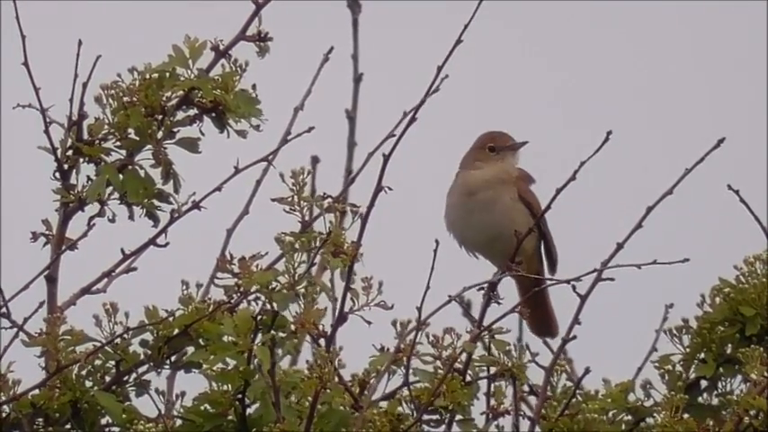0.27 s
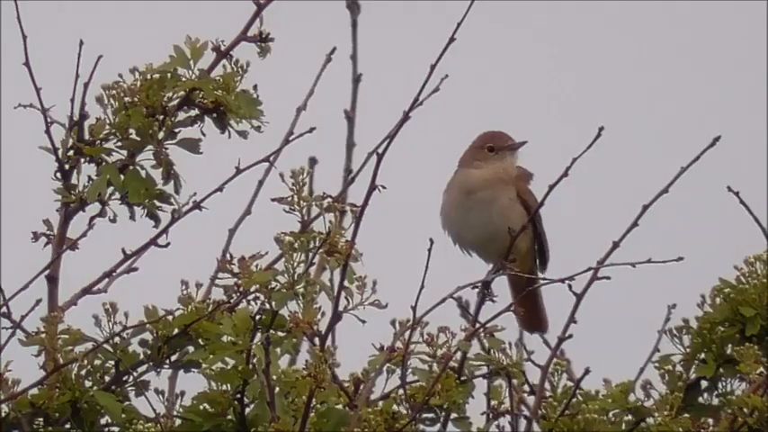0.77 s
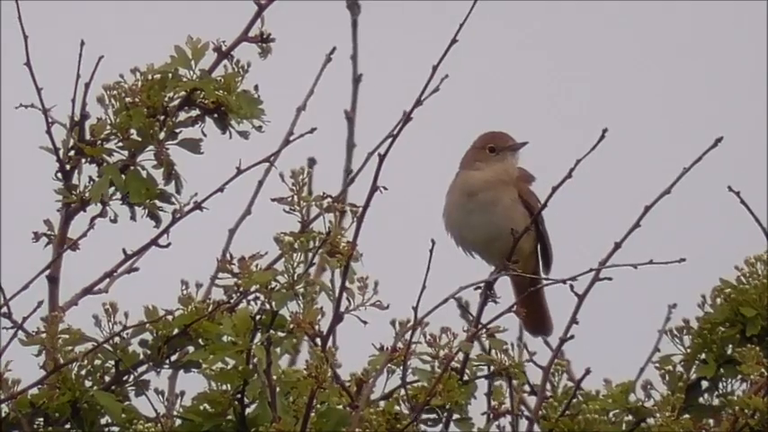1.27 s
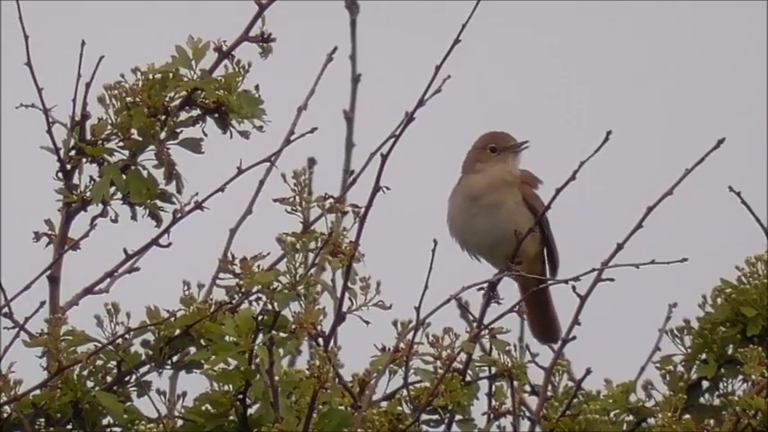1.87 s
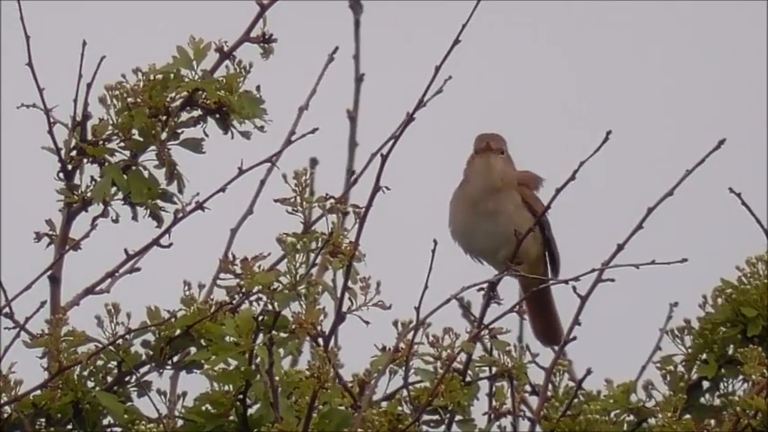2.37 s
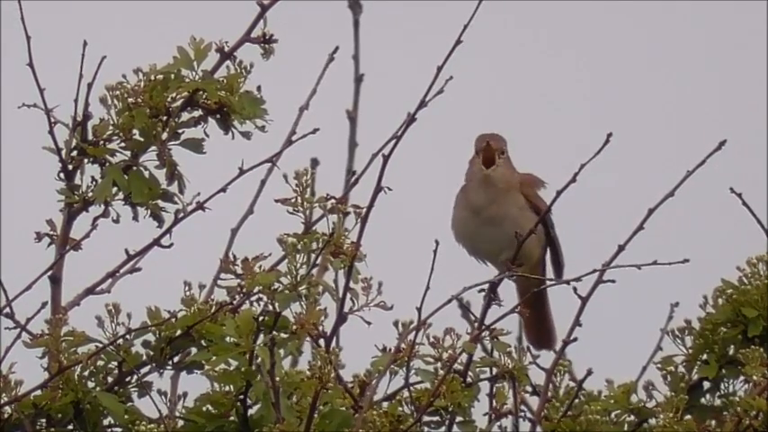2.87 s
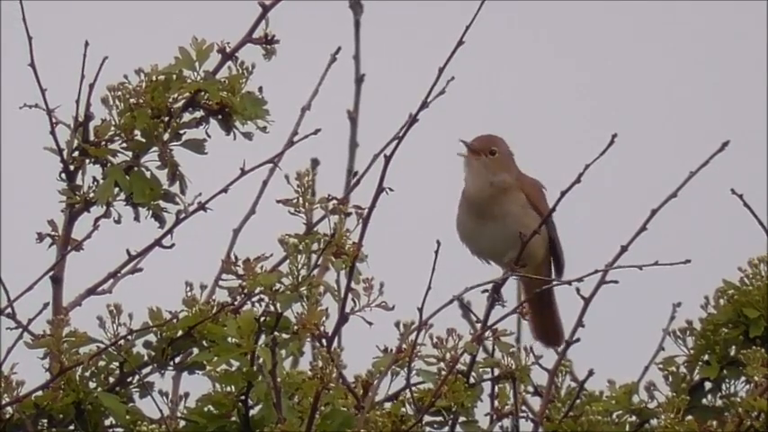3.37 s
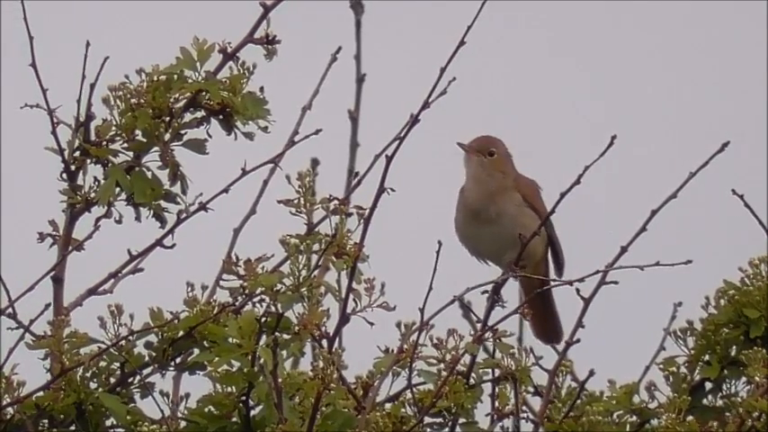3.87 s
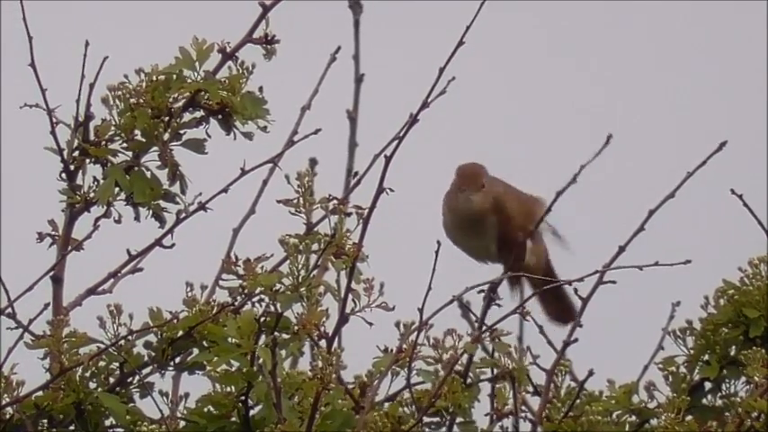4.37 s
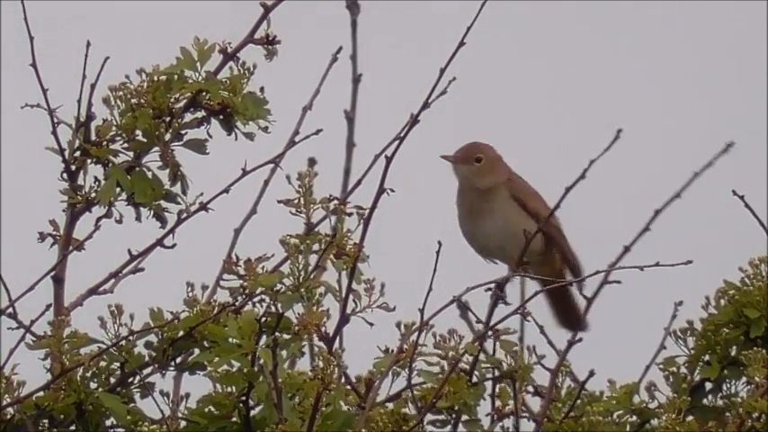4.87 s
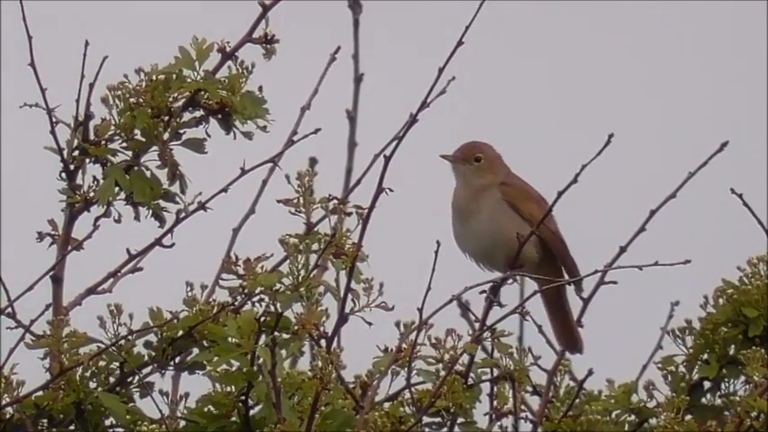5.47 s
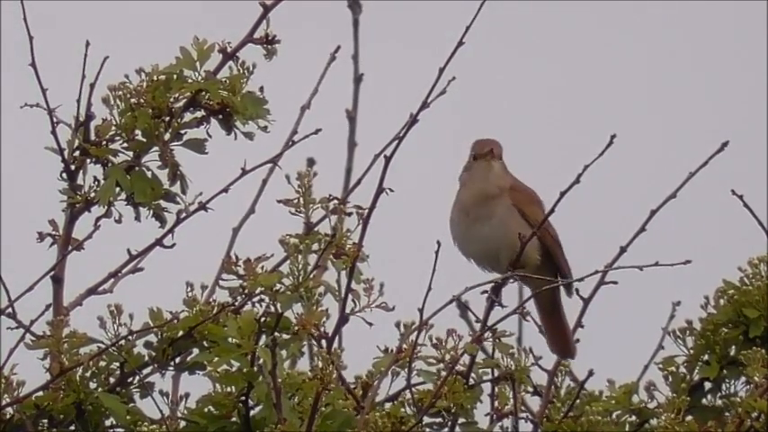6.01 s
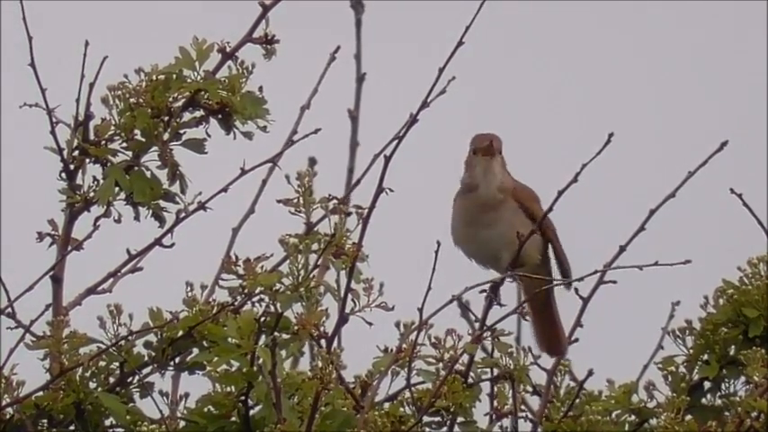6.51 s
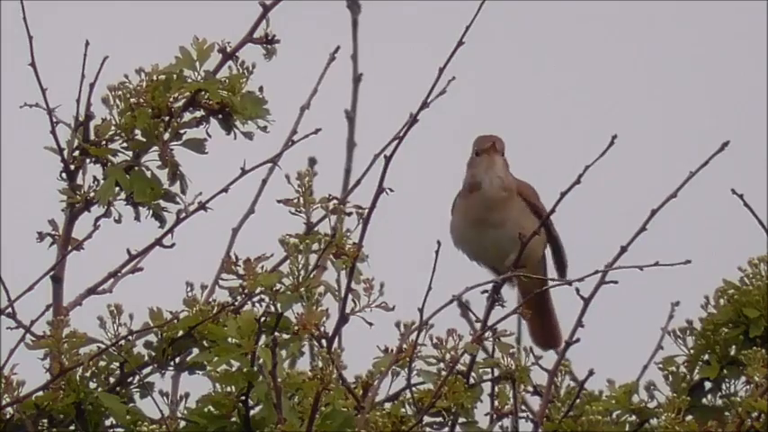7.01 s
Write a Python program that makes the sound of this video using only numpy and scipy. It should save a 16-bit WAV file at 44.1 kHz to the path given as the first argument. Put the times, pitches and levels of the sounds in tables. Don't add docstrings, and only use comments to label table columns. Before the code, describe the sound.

A nightingale on a bush sings two short phrases of buzzes, glides and a fast trill, over gusty wind rumble and distant birds.

```python
import sys
import numpy as np
from scipy import signal
from scipy.fft import rfft, irfft
from scipy.io import wavfile
from scipy.ndimage import uniform_filter1d

SR = 44100
rng = np.random.default_rng(int(sys.argv[2]) if len(sys.argv) > 2 else 0)


def magnitude_from_level(level_db):
    exponent = np.asarray(level_db, float) / 20
    return 10 ** exponent


def materialize(psi):
    bounded = np.clip(np.atleast_2d(psi).T, -1, 1)
    quanta = np.round(bounded * 32767).astype(np.int16)
    wavfile.write(sys.argv[1], SR, quanta)


N = 319725


def rms_one(x):
    return x / np.sqrt(np.mean(x ** 2) + 1e-20)


def at_hz(points, hz, column=1):
    points = np.array(points)
    return np.interp(np.log(hz + 1), np.log(points[:, 0]), points[:, column])


def drift(rate_hz):
    pole = np.exp(-40 * np.pi * rate_hz / SR)
    slow = signal.lfilter([1], [1, -2 * pole, pole * pole], rng.standard_normal(N // 20 + 4002))[4000:]
    return np.interp(np.arange(N) / 20, np.arange(len(slow)), rms_one(slow))


def band(x, low_hz, high_hz):
    return signal.sosfilt(signal.butter(2, [low_hz, min(high_hz, .45 * SR)], "band", fs=SR, output="sos"), x)


def bands(spectrum, low_hz, count, flicker):
    edges_hz = low_hz * 2 ** (np.arange(count + 1) / 3)
    white = rng.standard_normal((2, 2, N))
    out = np.zeros((2, N))
    for k, (low, high) in enumerate(zip(edges_hz, edges_hz[1:])):
        level_db = at_hz(spectrum, low * 1.148) + flicker(low)
        out += magnitude_from_level(level_db) * band(white[k % 2], low, high)
    return rms_one(out)


def add(out, start_s, sound):
    i = max(int(round(start_s * SR)), 0)
    out[i:i + len(sound)] += sound[:N - i]


# time_s, level_db
GUST = [(0, -32.5), (.36, -36), (.9, -34.5), (1.2, -38), (1.46, -33.5), (1.9, -40), (2.75, -38),
        (3.01, -38), (3.15, -28.5), (3.74, -39.5), (4.0, -39), (4.51, -38.5), (4.78, -44.5), (5.2, -36),
        (6.0, -37), (6.9, -35.5), (7.25, -32.5)]
# time_s, gain_db
BUFFETS = [(.76, 3.5), (1.01, 4.5), (1.44, 5), (1.88, -3), (2.17, 5), (3.14, -0.5), (2.44, 5), (3.836, 8),
           (5.198, 4), (5.36, -1.5), (5.497, 4.5), (5.606, -8), (6.115, 6.5), (6.222, -7), (6.31, 6),
           (6.39, -8), (7.15, 2)]
BUFFET_S = 0.036
# freq_hz, density_db_per_hz
WIND = [(12, -52), (20, -39), (79, -1), (144, 0.5), (256, -8), (743, -52), (1300, -106), (1690, -82),
        (2860, -120)]


def wind():
    t = np.arange(N) / SR
    gust_db = np.interp(t, *np.transpose(GUST))
    for s, db in BUFFETS:
        gust_db += db * np.exp(-((t - s) / BUFFET_S) ** 2)
    lumps = .5 * drift(4.1) + 0.77 * drift(39.0)

    def flicker_db(hz):
        return lumps * (0.54 + 0.71 * np.log2(hz / 22)) + 2.03 * drift(18.0)

    push, own = bands(WIND, 21.69, count=18, flicker=flicker_db)
    left = -magnitude_from_level(9.0) * np.pad(push, (2, 0))[:N]
    left += magnitude_from_level(0.5) * own + magnitude_from_level(9.0) * band(own, 344.0, 1035.0)
    return magnitude_from_level(gust_db) * np.array([left, magnitude_from_level(14.0) * push])


# freq_hz, density_db_per_hz
AIR = [(410, -29), (700, -2), (1190, -3), (1320, 3.5), (1690, -15.5), (2080, -10), (2590, -11),
       (4470, -5.5), (5790, -15.5), (7400, -14), (8000, -11.5), (15500, -15)]
AIR_DB = -59.5


def air():
    hiss = bands(AIR, 630.5, count=14, flicker=lambda hz: 1.0 * drift(4.3))
    return magnitude_from_level(AIR_DB) * hiss * magnitude_from_level(np.array([[1.6], [-1.6]]))


# freq_hz, gain_db
BEAK = [(5000, -54), (7300, -34), (8200, -25), (10000, -6.5), (12000, 2), (14000, -22), (16500, -40),
        (19000, -120)]


def whistle(hz, db, fade_s, overtones=()):
    phase = 2 * np.pi * np.cumsum(hz) / SR
    octaves = np.maximum(np.log2(hz / 2000), 0)
    tone = np.sin(phase)
    for k, over_db, slope_db in overtones:
        gain_db = over_db + slope_db * octaves + at_hz(BEAK, k * hz)
        tone = tone + magnitude_from_level(gain_db) * np.sin(k * phase)
    age_s = np.arange(len(hz)) / SR
    fade = np.clip(np.minimum(age_s, age_s[::-1]) / fade_s, 0, 1) ** 2
    return np.sqrt(2) * magnitude_from_level(db) * tone * fade


def note(rows, fade_s, overtones=()):
    s, hz, db = np.transpose(rows)
    t = np.arange(s[0] - fade_s / 2, s[-1] + fade_s / 2, 1 / SR)
    size = len(t) // (2 * len(s)) + 1
    track_hz = uniform_filter1d(np.interp(t, s, hz), size, mode="nearest")
    return whistle(track_hz, np.interp(t, s, db), fade_s, overtones)


def repeat(shape, rows, fade_s, overtones=()):
    out = np.zeros(N)
    for s, db, pitch in rows:
        sung = np.array(shape) * [1, pitch, 1] + [0, 0, db]
        add(out, s - fade_s / 2, note(sung, fade_s, overtones))
    return out


def warble(db, slope_db, turns, fade_s, overtones=()):
    s, hz = np.transpose(turns)
    place = np.interp(np.arange(s[0], s[-1], 1 / SR), s, np.arange(len(s)))
    eased = np.floor(place) + (1 - np.cos(np.pi * (place % 1))) / 2
    track_hz = np.interp(eased, np.arange(len(s)), hz)
    out = np.zeros(N)
    add(out, s[0], whistle(track_hz, db + slope_db * np.log2(track_hz / 3000), fade_s, overtones))
    return out


def shaken(hz, rate_hz, db, swing, lead_rad, dip_db, overtones):
    turn = 2 * np.pi * rate_hz * np.arange(len(hz)) / SR
    swell_db = -14. * np.clip(1 - turn / (4 * np.pi), 0, 1)
    level_db = db + swell_db - dip_db * (1 + np.cos(turn)) / 2
    return whistle(hz * (1 - swing * np.cos(turn + lead_rad)), level_db, 0.0025, overtones)


# time_s, level_db
CRICKET = [
    (0, -73.5),
    (3.6, -64.5),
    (5.5, -69),
    (7.25, -76),
]
# start_s, peak_db
CHIRPS = [(0.4253, -74), (0.5684, -59), (0.6293, -55), (0.7116, -73), (0.787, -63), (0.8997, -57),
          (1.0159, -70), (1.0868, -69), (1.2728, -70), (1.3442, -68), (1.4075, -64), (1.4769, -62),
          (1.5477, -51), (1.6201, -60), (1.6899, -52), (1.7627, -54), (1.8416, -53), (1.9638, -52),
          (2.0446, -49), (2.1374, -51), (2.2142, -56), (2.2865, -55), (2.3659, -56), (2.4407, -62),
          (3.8218, -53), (3.935, -60), (4.0278, -53), (4.1146, -51), (4.1715, -58), (4.2304, -48),
               (4.3496, -58), (4.4045, -54), (4.4908, -65), (4.5481, -53), (4.621, -61), (4.7362, -47),
               (4.813, -63), (4.8884, -59), (5.0565, -66), (5.1263, -69), (5.1987, -65), (5.3044, -58),
               (5.4147, -55), (5.5743, -52), (5.6965, -53), (5.8108, -48), (5.928, -46), (6.0667, -68)]
# time_s, pitch_hz, level_db
CHIRP = [(0, 2228, -8), (.012, 2080, -11.5), (.032, 2040, -20)]


def insects():
    beat = np.cos(2 * np.pi * np.cumsum(13.0 + 1.82 * drift(1.0)) / SR)
    cricket_db = np.interp(np.arange(N) / SR, *np.transpose(CRICKET))
    throb = rms_one(band(rng.standard_normal(N), 1888.0, 2224.0)) * magnitude_from_level(cricket_db - 4.5 + 7.9 * beat)
    chirps = repeat(CHIRP, [(s, db, 1) for s, db in CHIRPS], .008)
    whine = rms_one(band(rng.standard_normal(N), 7740., 7900.)) * magnitude_from_level(-79.0)
    return throb + chirps + whine


# start_s, length_s, from_hz, to_hz, level_db
FALLS = [(.112, 0.021, 3300, 1890, -64), (0.186, 0.027, 3350, 1740, -63), (0.243, .02, 4080, 3000, -67),
         (0.262, 0.028, 3400, 1770, -60.5), (0.344, 0.027, 3400, 1740, -64), (1.377, 0.08, 4260, 2680, -66),
         (1.655, 0.014, 7000, 4150, -56), (2.452, 0.087, 6250, 5700, -70), (2.48, 0.061, 12300, 11500, -69),
         (4.678, 0.036, 7430, 6900, -68.5), (4.741, 0.062, 7170, 6500, -71.5),
         (4.88, 0.056, 3720, 2460, -68), (5.505, 0.035, 2810, 2470, -64.5), (5.59, 0.0159, 6300, 5100, -63),
         (6.127, 0.068, 6630, 5700, -66)]
CLIMBS = [(1.03, 0.13, 2890, 3190, -72), (2.12, 0.01, 3980, 5500, -52.5), (2.32, 0.027, 3360, 4200, -60.5),
          (3.95, .07, 5080, 5440, -73), (4.42, 0.045, 3230, 4660, -64.5), (4.585, 0.06, 3140, 4990, -64),
          (4.04, .022, 3480, 4900, -75), (4.152, .015, 3660, 4740, -74), (5.262, .014, 4670, 6060, -69)]
HELD = [(0., 0.059, 3630, 3550, -68), (.03, 0.07, 2150, 2050, -72), (.07, 0.11, 1330, 1290, -76),
        (1.785, 0.11, 3620, 3780, -66), (2.16, 0.1, 3660, 3720, -62), (4.08, 0.083, 2800, 2880, -67),
        (5.457, 0.054, 2850, 2860, -65.5), (5.765, 0.13, 2780, 2800, -67), (6.16, 0.26, 1290, 1370, -78),
        (6.445, .095, 1365, 1385, -76), (5.04, .15, 1350, 1390, -79), (5.275, .12, 2110, 2040, -73),
        (4.9, .09, 2060, 2050, -73)]
GLIDE_DB_PER_OCTAVE = 10


def far_glides():
    out = np.zeros(N)
    for s, length_s, *ends_hz, db in FALLS + CLIMBS + HELD:
        ends_db = db - GLIDE_DB_PER_OCTAVE * np.log2(np.array(ends_hz) / min(ends_hz))
        rows = np.transpose([(0, length_s), ends_hz, ends_db])
        add(out, s - .004, note(rows, 0.00626 + 0.028 * length_s))
    return out


def hedge_chorus():
    out = np.zeros(N)
    for when, pitch, bend, span, loud in rng.random((700, 5)):
        hz = 2400 * 2 ** pitch
        db = -81 + 4 * loud + 4.5 * (.52 < when < .83)
        rows = [(0, hz, db), (0.0098 + 0.0217 * span, hz * 2 ** (.7 * bend - .35), db)]
        add(out, when * (N / SR - .1), note(rows, 0.00915))
    return out


# [(time_s, pitch_hz)]
CURLS = [(-69, [(.15, 2980), (.172, 3030), (.192, 2350)]), (-77, [(.25, 3400), (.275, 2570)]),
         (-73, [(.27, 2170), (.355, 2060)]), (-77.5, [(.37, 3480), (.41, 3580), (.45, 3500)]),
         (-76, [(.472, 3500), (.492, 3560)]), (-74, [(1.21, 3600), (1.252, 4580)]),
         (-67, [(1.39, 2960), (1.432, 2890)]), (-64, [(1.495, 3820), (1.516, 4110), (1.542, 3130)]),
         (-71, [(1.61, 4850), (1.645, 4280)]), (-56, [(1.682, 4180), (1.697, 5070), (1.724, 5780)]),
         (-64, [(1.98, 4080), (2.01, 5500)]), (-69, [(1.998, 3200), (2.045, 4520)]),
         (-66, [(2.083, 4950), (2.105, 5420)]), (-63, [(2.095, 4760), (2.115, 4850)]),
         (-76, [(2.29, 4500), (2.36, 4330)]), (-69.5, [(2.36, 3950), (2.43, 3820)]),
         (-70, [(2.69, 3720), (2.75, 3850)]), (-69, [(3.465, 4230), (3.51, 4970), (3.545, 3480)]),
         (-65.5, [(3.6, 3870), (3.652, 4630), (3.685, 3440)]), (-64, [(3.76, 3700), (3.795, 4500)]),
         (-68, [(3.808, 4200), (3.835, 3530)]),
         (-72.5, [(3.825, 2300), (3.97, 2270), (3.998, 2210), (4.04, 2265), (4.112, 2270)]),
              (-70.5, [(3.892, 2540), (3.935, 2690), (4.03, 2740)]), (-68.5, [(3.915, 4850), (3.95, 4920)]),
              (-74, [(4.232, 4430), (4.272, 4600)]), (-80, [(4.285, 4100), (4.33, 4200), (4.4, 5220)]),
              (-65.5, [(4.365, 2930), (4.42, 2970), (4.51, 2905), (4.55, 3000), (4.665, 2950)]),
              (-67.5, [(4.735, 2750), (4.785, 3600), (4.81, 5330)]), (-76, [(4.82, 3350), (4.885, 3010)]),
              (-74, [(4.945, 3270), (4.962, 3720), (4.982, 3150)]), (-73, [(5.022, 3150), (5.065, 3760),
              (5.092, 4350)]), (-74, [(5.05, 3070), (5.138, 3040)]), (-68, [(5.015, 4700), (5.04, 5500)]),
              (-72, [(5.148, 3770), (5.172, 3430)]), (-70, [(5.175, 3870), (5.2, 4500)]),
              (-78, [(5.258, 3270), (5.322, 3560)]), (-74, [(5.22, 3950), (5.29, 3930)]),
              (-63, [(5.34, 3850), (5.362, 3970)]), (-68, [(5.478, 4000), (5.502, 4000)]),
              (-65, [(5.645, 4160), (5.663, 2830), (5.685, 2380)]), (-72, [(5.697, 2520), (5.748, 2730)]),
              (-67, [(5.91, 4500), (5.932, 3600)]), (-70, [(5.945, 2110), (6.002, 1920)]),
              (-70, [(5.96, 3570), (5.99, 3350), (6.012, 3430)]), (-79, [(6.015, 2230), (6.1, 2320)]),
              (-74, [(6.098, 2660), (6.145, 2960)]),
         (-71, [(3.9, 3400), (3.96, 3520), (4.055, 2850)]),
    (-69, [(4.145, 3290), (4.21, 3450), (4.3, 2880)]),
    (-62, [(2.165, 4400), (2.235, 2600)]),
]


def hedge_curls():
    return sum(warble(db, 0, turns, 0.0059) for db, turns in CURLS)


# start_s, peak_db, centre_hz
TICKS = [
    (0.202, -42, 766),
    (.925, -40, 7040),
    (1.017, -43.5, 640),
    (2.663, -40, 9500),
    (6.525, -55, 5030),
    (4.796, -39, 870),
    (5.737, -37.5, 4500),
]


def twigs():
    out = np.zeros(N)
    for s, db, hz in TICKS:
        tick = band(np.eye(1, 600)[0], hz / 1.39, hz * 1.17)
        add(out, s, magnitude_from_level(db) * tick / np.abs(tick).max())
    return out


# start_s, level_db, pitch_scale
SLIDE = [(0, 6999, -13), (.03, 5768, -5), (.06, 5248, 2.5), (.082, 4495, -8)]
SLIDES = [
    (0.236, -71, 1),
    (0.388, -62.5, .99),
    (0.541, -59.5, 1.007),
]
LIFT = [(0, 3570, -4), (.05, 3650, -2), (.064, 4040, -1), (.08, 4650, 1), (.096, 5330, -1.5),
        (.116, 6300, -12)]
LIFTS = [
    (1.275, -53, 1.),
    (1.462, -54, 1),
]
STEP = [(0, 3140, -9), (.067, 3180, -9), (.082, 4530, 0), (.11, 4310, -3)]
STEPS = [
    (2.001, -52, 0.96),
    (2.409, -53, 0.95),
]
# [(time_s, pitch_hz)]
FAR_WARBLES = [
    (-67.5, -2, [(1.47, 2850), (1.585, 2540), (1.635, 3320), (1.668, 3180), (1.705, 4080), (1.735, 4180)]),
    (-71.5, -34, [(1.71, 2516), (1.8, 2765), (1.97, 2863), (1.995, 2540)]),
    (-62, 23, [(1.79, 3070), (1.835, 3037), (1.88, 3820), (1.925, 2920)]),
    (-64, 8, [(2.592, 5670), (2.616, 2975), (2.665, 3040), (2.7, 2750)]),
]


def far_songs():
    out = np.zeros(N)
    for shape, rows in [(SLIDE, SLIDES), (LIFT, LIFTS), (STEP, STEPS)]:
        out += repeat(shape, rows, 0.00723)
    for row in FAR_WARBLES:
        out += warble(*row, 0.0055)
    return out


# time_s, pitch_hz, level_db
CROOK = [(0, 4955, -5.5), (.027, 5210, 2.5), (.039, 4400, 1), (.055, 3210, 0)]
# start_s, level_db
CROOKS = [
    (0.7, -59),
    (0.81, -55.5),
    (0.923, -53.5),
    (1.041, -54),
    (1.152, -54),
]


def far_crooks():
    out = np.zeros(N)
    for s, db in CROOKS:
        add(out, s - .004, note(np.array(CROOK) + [0, 0, db], 0.0079))
    return out


# start_s, count, gap_s, first_hz, peak_db
CHIPS = [
    (.96, 4, .084, 8950, -45),
    (2.5094, 3, .0605, 8500, -42),
    (4.2163, 8, .0578, 8750, -50),
]
CHIP_SAG_HZ, CHIP_SWELL_DB = 66.4, 0.93


def far_chips():
    out = np.zeros(N)
    for s, count, gap_s, first_hz, first_db in CHIPS:
        for k in range(int(count)):
            hz = first_hz - k * CHIP_SAG_HZ
            db = first_db + k * CHIP_SWELL_DB
            chip = note([(0, hz * 1.022, db - 16), (.009, hz * 0.93, db - 25.5)], 0.00083)
            add(out, s + k * gap_s - .002, chip)
    return out


# start_s, length_s, rolls_hz, level_db, second_overtone_db
CHURRS = [
    (2.232, 0.124, 41, -66.5, 62.5),
    (5.877, 0.118, 42, -68, 63.5),
]
CHURR_HZ = 1520


def far_churrs():
    out = np.zeros(N)
    for s, length_s, rate_hz, db, second_db in CHURRS:
        hz = np.linspace(CHURR_HZ, .91 * CHURR_HZ, int(length_s * SR))
        overtones = [(2, second_db + 1.5, 0), (3, second_db - 10.0, 0)]
        add(out, s, shaken(hz, rate_hz, db + 0.5, 0.053, -0.76, 12.0, overtones))
    return out


# start_s, peak_db
HOOKS = [
    (4.1894, -69),
    (4.2303, -73),
    (4.262, -70),
    (4.398, -66.5),
    (4.562, -67.5),
    (4.7361, -68.5),
    (5.69, -72),
    (5.803, -73),
]


def far_hooks():
    out = np.zeros(N)
    for s, db in HOOKS:
        add(out, s, note([(0, 2508, db + 6), (.013, 1918, db + 2.5), (.03, 2450, db - 9)], 0.004))
    return out


def far_birds():
    calls = far_glides() + hedge_chorus() + hedge_curls() + far_songs()
    calls += far_crooks() + far_chips() + far_churrs() + far_hooks()
    return calls * magnitude_from_level(2.2 * drift(45))


# multiple, level_db, slope_db_per_octave above 2 kHz
OVERTONES = [(2, -4, 2.5), (3, -26, 13), (4, -35, 0)]
# start_s, peak_db, pitch_scale
THIN = [(0, 8900, -12), (.012, 8310, -4), (.038, 8170, 0), (.076, 7750, -10)]
THINS = [
    (2.4586, -42.5, 0.99),
    (6.116, -50, 0.96),
]
RISE = [(0, 2844, -23.5), (.028, 2770, -7), (.056, 2930, -1), (.096, 3920, -2.5), (.112, 4090, -4.5),
        (.12, 3960, -7)]
RISES = [
    (2.716, -28, 0.999),
    (6.375, -30, 1.032),
]
SNAP = [(0, 4060, -9), (.002, 4940, -6.5), (.0035, 5800, 7)]
SNAPS = [
    (3.385, -34.5, 1.02),
    (6.6546, -35, 0.89),
]
WHIP = [(0, 11570, -19), (.004, 12950, -10), (.009, 13450, -5), (.013, 12800, -4), (.0165, 10400, -2),
        (.02, 7700, -9)]
WHIPS = [
    (7.0169, -22, 1.002),
    (7.1586, -20.5, 1.018),
]
FLICK = [(0, 6560, -0.5), (.0035, 4300, -3)]
# after_whip_s, under_whip_db, pitch_scale
FLICKS = [
    (0.0161, -10, 0.99),
    (0.0204, -12.5, 0.94),
]
DROP = [(0, 2300, -1), (.003, 1900, -7), (.008, 1590, -6.5), (.014, 1445, -11)]
DROPS = [
    (7.055, -33, 1.01),
    (7.0858, -37, 0.94),
    (7.198, -32.5, 1.04),
]


def syllables():
    out = np.zeros(N)
    flicks = []
    for s, db, _ in WHIPS:
        flicks += [(s + after_s, db + under_db, pitch) for after_s, under_db, pitch in FLICKS]
    sung = [(THIN, THINS), (RISE, RISES), (SNAP, SNAPS), (WHIP, WHIPS), (FLICK, flicks), (DROP, DROPS)]
    for shape, rows in sung:
        out += repeat(shape, rows, 0.0024, OVERTONES)
    return out


# start_s, length_s, start_hz, end_hz, shakes_hz, level_db
BUZZES = [
    (2.601, 0.0334, 5500, 5320, 147, -35),
    (6.2622, 0.032, 5600, 5220, 159, -35),
    (6.5816, 0.0257, 1520, 1500, 122, -46.5),
    (6.7865, .05, 5790, 5380, 104., -35),
]
SMOOTH_SHAKES_HZ, DIP_DB_PER_HZ = 199.6, 0.2438


def buzzes():
    buzz, hoarse = np.zeros((2, N))
    for s, length_s, hz, end_hz, rate_hz, db in BUZZES:
        dip_db = DIP_DB_PER_HZ * (SMOOTH_SHAKES_HZ - rate_hz)
        falling_hz = np.linspace(hz, end_hz, int(length_s * SR))
        overtones = [(1.5, 3.0 * dip_db - 60, 0), (2, 1.15 * dip_db - 18, 0.0058)]
        sound = shaken(falling_hz, rate_hz, db, 0.06, 3.44, dip_db, overtones)
        add(buzz, s, sound)
        add(hoarse, s, 0.055 * max(dip_db - 12.0, 0) * sound)
    return buzz, hoarse


# time_s from its loudest onset, pitch_hz, level_db
SWEEP = [(-.0035, 4340, -29.5), (0., 7540, -28.5), (.0012, 8770, -15.5), (.0035, 10100, -9),
         (.007, 11470, -15)]
# start_s, peak_db, pitch_scale
TRILL = [
    (2.9107, -16, 0.89),
    (2.9454, -11.5, 0.97),
    (2.979, -10.5, 1),
    (3.0114, -11, 1.01),
    (3.0444, -11.5, 1.03),
    (3.079, -10.5, 1.014),
    (3.1137, -12, 1.03),
    (3.147, -14.5, 0.97),
]
STRETCH_PER_SAG = 1.5


def trill_sweeps():
    out = np.zeros(N)
    for s, db, scale in TRILL:
        stretch = 1 + STRETCH_PER_SAG * (1 - scale)
        rows = np.array(SWEEP) * [stretch, scale, 1] + [0, 0, db]
        add(out, s + SWEEP[0][0], note(rows, 0.00139, [(2, 11.5, 0)]))
    return out


# [(time_s, pitch_hz)]
PRESSED_ARCH = (-22.5, 24, [(3.246, 1076), (3.268, 1424), (3.298, 2045), (3.333, 1380)])
WARBLES = [
    (-33, 8, [(3.3865, 3490), (3.392, 4240), (3.4053, 2414), (3.4252, 3476), (3.4415, 2540), (3.4586, 3514), (3.4775, 2430), (3.488, 2830)]),
    (-31, 14, [(3.596, 2306), (3.613, 1523), (3.651, 3297), (3.69, 1520)]),
    (-36.5, 1, [(3.737, 3120), (3.748, 6220), (3.764, 5260), (3.779, 4780)]),
    (-44, 1.5, [(3.741, 4420), (3.747, 5700), (3.756, 4750)]),
    (-35, -1.5, [(6.6565, 3240), (6.661, 3950), (6.678, 2115), (6.69, 2170)]),
    (-37.5, -15, [(6.704, 2820), (6.738, 2490)]),
    (-33.5, 2.5, [(6.889, 1900), (6.911, 2678), (6.924, 2370)]),
    (-35, 2, [(7.227, 1930), (7.239, 1360)]),
    (-37, 8, [(6.931, 1860), (6.95, 1490), (6.963, 1010)]),
]
WARBLE_FADE_S = 0.0059
# multiple, level_db, slope_db_per_octave above 2 kHz
PRESSED_OVERTONES = [(5, -20, -60.), (6, -26, -60.)]


def warbles():
    arch = warble(*PRESSED_ARCH, 0.01, OVERTONES + PRESSED_OVERTONES)
    return arch + sum(warble(*row, WARBLE_FADE_S, OVERTONES) for row in WARBLES)


# start_s, rise_s, level_db
BROAD_BURSTS = [
    (3.371, 0.015, -45),
    (3.73, 0.01, -40),
    (6.638, 0.016, -48),
    (6.787, 0.023, -41),
    (7.028, 0.011, -41),
    (7.153, 0.01, -50),
    (7.171, 0.011, -35),
]
TRILL_NOISE_DB, TRILL_NOISE_S = -32, 0.0081


def burst_gate():
    gate = np.zeros(N)
    bursts = [(s + SWEEP[0][0], TRILL_NOISE_S, db + TRILL_NOISE_DB) for s, db, _ in TRILL]
    for s, rise_s, db in BROAD_BURSTS + bursts:
        rises = np.arange(SR // 8) / (rise_s * SR)
        add(gate, s, magnitude_from_level(db) * (rises * np.exp(1 - rises)) ** 2)
    return gate


def nightingale():
    raw_noise = rng.standard_normal((3, N))
    fine = rms_one(band(raw_noise[0], 60., 1100.0))
    wide = rms_one(band(raw_noise[1], 300., 3430.0))
    burst_noise = band(raw_noise[2], 8700.0, 12100.0) + 0.74 * band(raw_noise[2], 3500.0, 6460.0)
    burst_noise += 0.027 * band(raw_noise[2], 2500., 15000.)
    clean = (syllables() + warbles()) * (1 + 0.0099 * fine)
    buzz, hoarse = buzzes()
    rough_buzz = buzz * (1 + .17 * fine) + band(hoarse * wide, 3200, 15000)
    rough_trill = trill_sweeps() * (1 + 0.23 * fine + 0.11 * wide)
    return clean + rough_trill + rough_buzz + burst_gate() * rms_one(burst_noise)


# freq_hz, left_minus_right_db, left_lead_rad
PORTS = [(417, 41, -5), (1350, 12.5, -0.2), (2810, 6, -1.3), (4500, 5, 0.5), (7700, 12, 1.1),
         (12600, 1.3, 0.76)]


def ports(x, spread):
    hz = np.fft.rfftfreq(N, 1 / SR)
    left = magnitude_from_level(at_hz(PORTS, hz) * spread) * np.exp(1j * at_hz(PORTS, hz, column=2))
    return np.array([irfft(rfft(x) * left, N), x]) * magnitude_from_level(-5 * spread)


def echoes(x, near_db, near_s, far_db, far_s):
    age_s = np.arange(SR // 2) / SR
    shared, own = rng.standard_normal(len(age_s)), rng.standard_normal((2, len(age_s)))
    noise = (shared + 1.05 * own) * (age_s > .001)
    dull = signal.lfilter([.3], [1, -.7], noise)
    tail = noise * magnitude_from_level(near_db - 60 * age_s / near_s) + dull * magnitude_from_level(far_db - 60 * age_s / far_s)
    return x + signal.fftconvolve(x, tail, axes=1)[:, :N]


def scene():
    near = echoes(ports(nightingale(), spread=0.6), -28.5, 0.012, -39.5, 0.28)
    distant = far_birds() * magnitude_from_level(5.5) + insects() + twigs()
    far = echoes(ports(distant, spread=0.44), -34.5, 0.078, -40.5, 0.5)
    return near + far + wind() + air()


def drop_quiet_bands(x):
    hz, _, z = signal.stft(x, SR, nperseg=1024)
    strips = z[:, :504].reshape(2, 126, 4, -1)
    strip_hz = hz[2:504:4]
    power = uniform_filter1d((np.abs(strips) ** 2).sum(axis=(0, 2)), size=5, axis=1)
    share = .54 + .24 * np.exp(-((strip_hz - 6600) / 1000) ** 2)
    local = .9 * uniform_filter1d(power, size=30, axis=1)
    usual = np.minimum(np.median(power, axis=1, keepdims=True), local)
    weak = (power < share[:, None] * usual) & (strip_hz[:, None] > 4700)
    loudest = power[10:].max(axis=0)
    shaded = (strip_hz[:, None] > 14000) | (np.abs(strip_hz[:, None] - 5900) < 1200)
    weak |= shaded & (power < loudest * magnitude_from_level(-102))
    z[:, :504] = (strips * np.where(weak, .05, 1)[None, :, None]).reshape(2, 504, -1)
    return signal.istft(z, SR, nperseg=1024)[1][:, :N]


def roll_off(x):
    return signal.sosfilt(signal.butter(12, 15710, fs=SR, output="sos"), x)


def record(dry):
    cut = signal.sosfilt(signal.cheby2(10, 50, 16200, fs=SR, output="sos"), dry)
    return roll_off(drop_quiet_bands(cut))


dry = scene()
out = record(dry)
materialize(out)
```